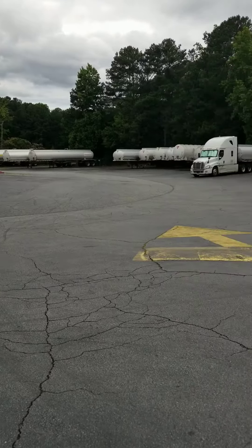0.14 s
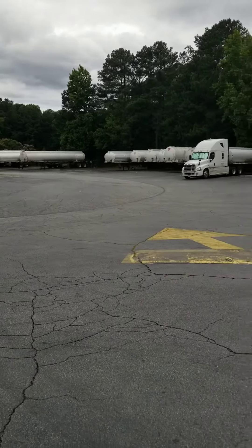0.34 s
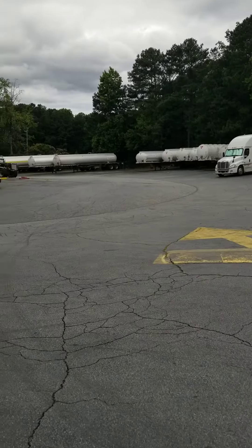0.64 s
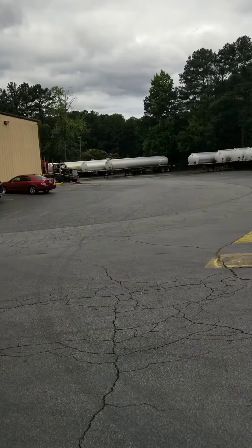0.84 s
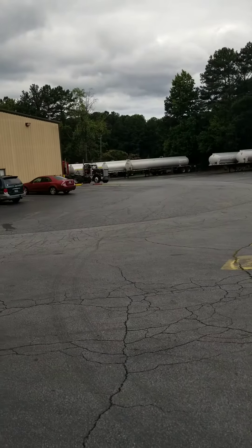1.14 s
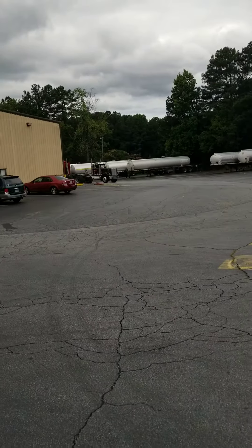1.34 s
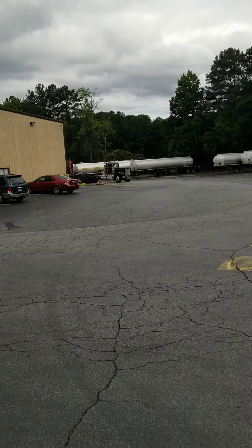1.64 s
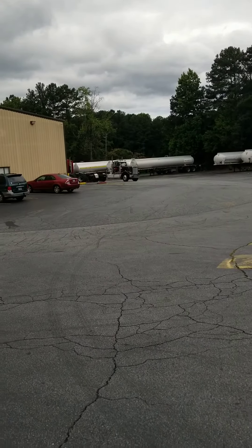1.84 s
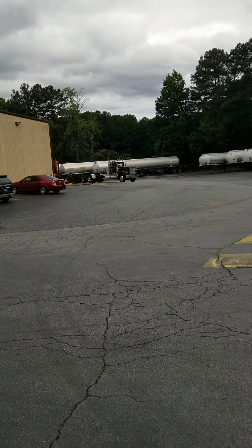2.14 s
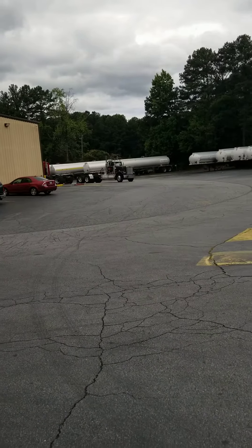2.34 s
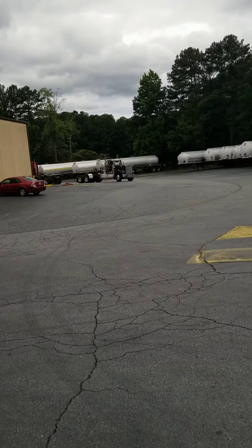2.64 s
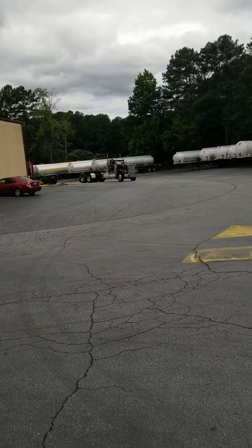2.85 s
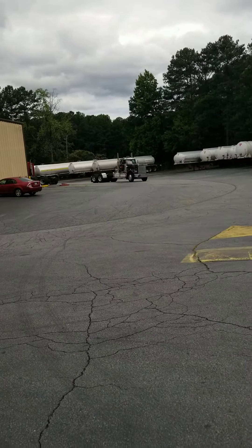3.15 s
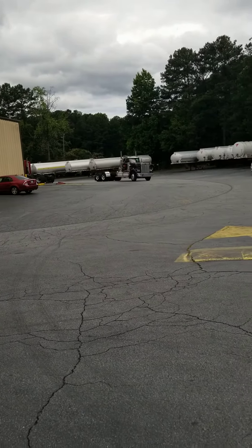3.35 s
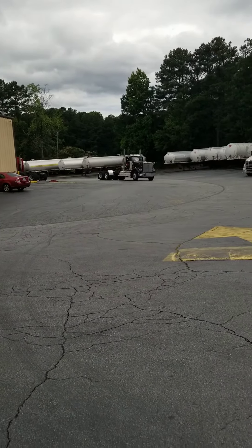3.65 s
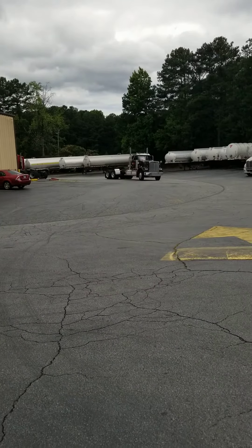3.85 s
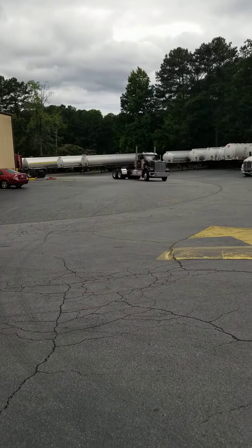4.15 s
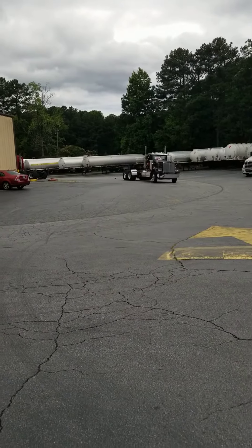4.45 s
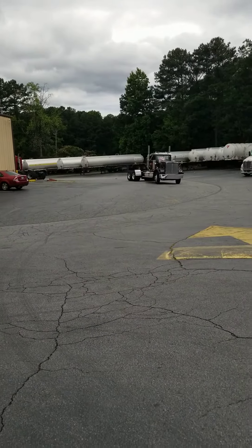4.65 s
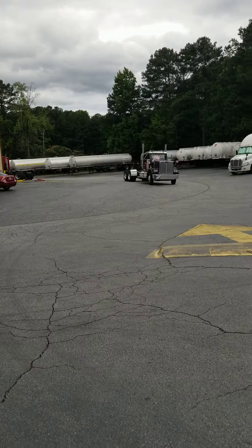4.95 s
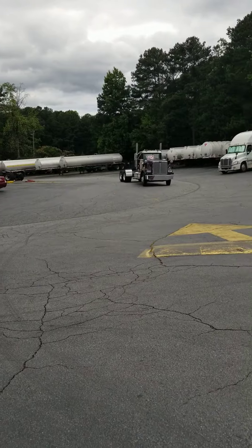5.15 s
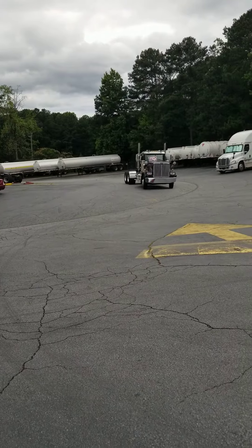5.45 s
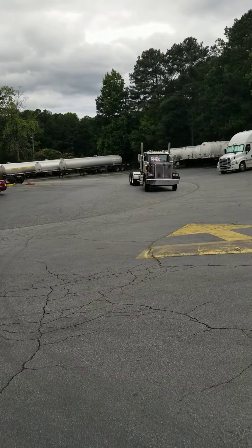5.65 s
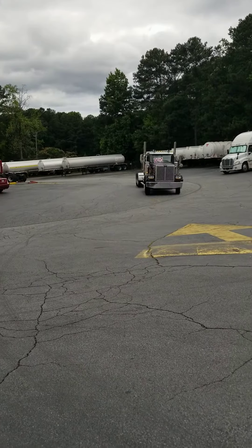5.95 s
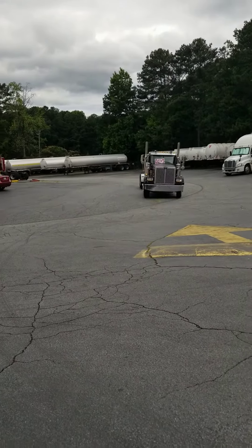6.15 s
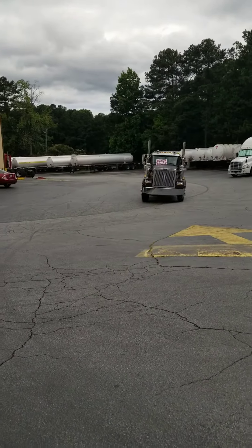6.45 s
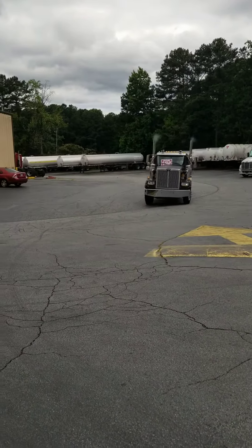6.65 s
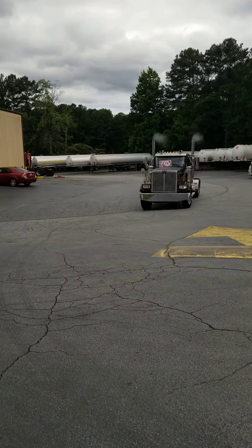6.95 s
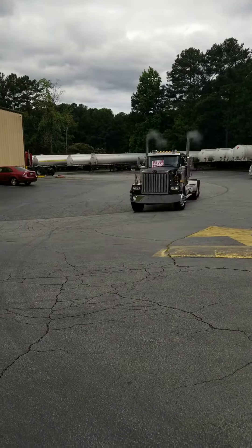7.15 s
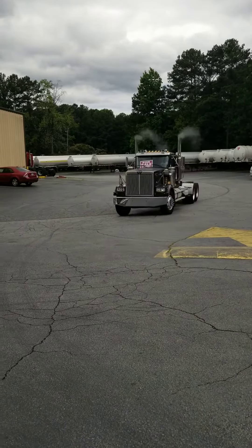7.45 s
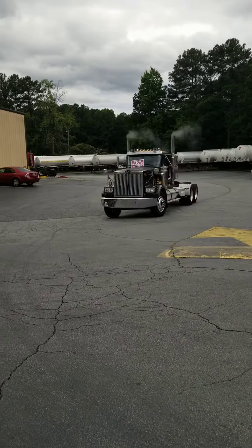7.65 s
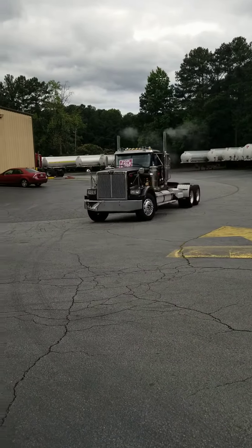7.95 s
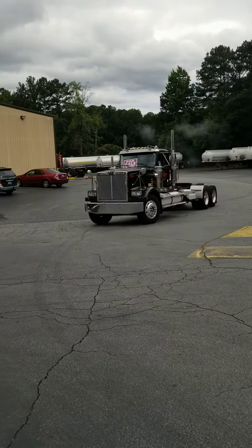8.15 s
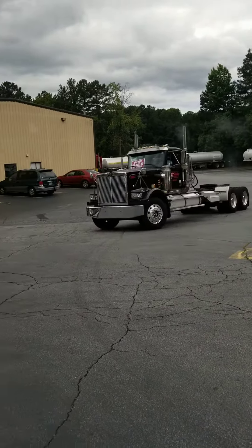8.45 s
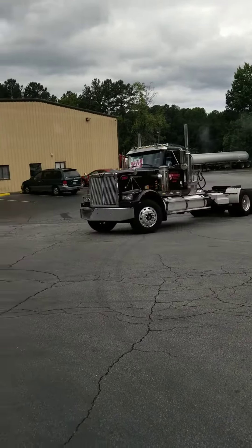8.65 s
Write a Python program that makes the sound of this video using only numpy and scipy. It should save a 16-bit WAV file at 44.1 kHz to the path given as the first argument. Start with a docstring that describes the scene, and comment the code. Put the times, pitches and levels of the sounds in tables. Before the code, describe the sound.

A six-cylinder diesel truck emerges from behind a shed in an open paved yard, its exhaust drone climbing and growing louder with clatter and intake whistle. Around six seconds a low wind bump hits the phone and the engine brake fires harsh, rapid cracks that slow as revs fall, echoing off buildings and trees. Then the engine runs lightly, the chassis squeaks twice, and it pulls again close by.

```python
"""A six-cylinder diesel tractor unit comes from behind a shed towards a phone in a paved yard, revs rising.
At about 6 s, some 34 m off, a gust meets the phone and the engine brake barks through the stacks.
After 7.3 s the engine runs on with little load, the chassis squeaks twice, and it picks up close by.
One crankshaft times exhaust orders, knocks, gear tones and brake cracks, made of sines, noise and pulses;
the ground reflects exhaust and brake cracks, and the yard echoes the brake, over a faint distant hum."""
import sys
import numpy as np
from scipy import signal
from scipy.fft import rfft, irfft
from scipy.io import wavfile

SR = 44100
rng = np.random.default_rng(int(sys.argv[2]) if len(sys.argv) > 2 else 0)


def wav_record(signal):
    """Record a signal, one row per channel, as 16-bit PCM in the file named by sys.argv[1]."""
    frames = np.transpose(np.atleast_2d(signal))
    bounded = np.clip(frames, -1, 1)
    # unit amplitude maps onto the largest positive 16-bit level
    quanta = np.round(bounded * 32767).astype(np.int16)
    wavfile.write(sys.argv[1], SR, quanta)


N = 388521
T = np.arange(N) / SR


def undb(db):
    """Decibels to gain."""
    return 10 ** (np.asarray(db) / 20)


def curve(rows, t=T):
    """The columns of a time table, interpolated at the times t."""
    s, *columns = np.transpose(rows)
    return [np.interp(t, s, column) for column in columns]


def unit(x):
    """Scale to rms 1."""
    return x / np.sqrt(np.mean(x ** 2))


def colour_at(points, hz):
    """Gain at hz of a spectrum given as (pitch_hz, level_db) points."""
    f, db = np.transpose(points)
    return undb(np.interp(np.log(np.maximum(hz, 1)), np.log(f), db))


def colour(x, points):
    """Causal minimum-phase filter with the given spectrum, built by folding its cepstrum."""
    size = 8192
    cepstrum = irfft(np.log(colour_at(points, np.fft.rfftfreq(size, 1 / SR))))
    cepstrum[1:size // 2] *= 2
    cepstrum[size // 2 + 1:] = 0
    response = irfft(np.exp(rfft(cepstrum)))
    return signal.oaconvolve(np.atleast_2d(x), response[None], axes=-1)[:, :N]


def walk(rate):
    """Smooth random wander with a spread near 1, through rate new values a second."""
    steps = rng.standard_normal(1024)
    place = np.minimum(T * rate, len(steps) - 2)
    k = place.astype(int)
    blend = (1 - np.cos(np.pi * (place - k))) / 2
    return steps[k] + (steps[k + 1] - steps[k]) * blend


def pair(apart):
    """Left and right noise, alike in the bass; in the treble apart 0 is alike, 1 unrelated."""
    mid, side = rng.standard_normal((2, N))
    side = signal.sosfilt(signal.butter(2, 850, "high", fs=SR, output="sos"), side)
    return mid + apart * np.array([side, -side])


def swish(hz, width_hz):
    """A narrow band of noise around a centre that may move; rms 1."""
    low_pass = signal.butter(2, width_hz / 2, fs=SR, output="sos")
    slow = signal.sosfilt(low_pass, rng.standard_normal((2, N)))
    angle = 2 * np.pi * np.cumsum(hz * np.ones(N)) / SR
    return unit(slow[0] * np.cos(angle) + slow[1] * np.sin(angle))


# the steady approach, and the distance at which the loudness laws hold
START_M, APPROACH_M_S, REFERENCE_M = 78, 7.3, 30


def distance():
    """Metres from the truck to the phone."""
    return START_M - APPROACH_M_S * T


STACK_HEIGHT_M, PHONE_HEIGHT_M, SOUND_M_S = 3.825, 1.51, 343


def bounce(x, share):
    """Stack sound comes direct and off the ground, later as the truck nears: a comb that slides down."""
    lag_s = 2 * STACK_HEIGHT_M * PHONE_HEIGHT_M / distance() / SOUND_M_S
    late = np.array([np.interp(T - lag_s, T, channel) for channel in x])
    return (x + share * late) / np.sqrt(1 + share ** 2)


# engine speed: start_s, firing_hz (firings a second, all cylinders)
SPEED = [(0, 75.1), (1.1, 74.7), (2.2, 81.5), (3.3, 87.7), (4.4, 91.6), (4.95, 94.6), (5.3, 93.8),
         (6.0, 88.47), (6.3, 82.79), (6.65, 76.14), (7.0, 67.8), (7.35, 60.06), (7.6, 66.4), (7.9, 62.1),
         (8.45, 62), (8.81, 68.5)]
# how hard the engine works, pulling or braking: start_s, load (0 none, 1 full throttle)
LOAD = [(0, 0.44), (1.8, 0.99), (3.0, 0.95), (4.1, 1), (5.3, 0.71), (5.6, 0.71), (5.93, 0.6), (6.1, 1.4),
        (7.3, 0.84), (7.5, 0.31), (7.8, 0), (8.35, 0.0074), (8.62, .62), (8.81, .66)]
CRUISE_HZ = 90  # firing rate at which the loudness laws hold
# the truck comes out from behind the shed between these times
EMERGES_S, IN_VIEW_S = 0.56, 1.02


def loudness(law):
    """Gain of one part of the engine from load, revs, distance and the shadow of the shed."""
    full_db, idle_db, revs_db, distance_db, shed_db = law
    (load,), (hz,) = curve(LOAD), curve(SPEED)
    hidden = np.clip((IN_VIEW_S - T) / (IN_VIEW_S - EMERGES_S), 0, 1)
    work_db = full_db - idle_db * (1 - load) + revs_db * np.log2(hz / CRUISE_HZ)
    path_db = distance_db * np.log2(distance() / REFERENCE_M) + shed_db * hidden
    return undb(work_db - path_db)


BRAKE_ON_S, BRAKE_OFF_S = 6.0003, 7.325
# gain of burble, turbo and accessory whine left while the brake cuts the fuel; time to cut it
COAST_SHARE, FUEL_CUT_S = 0.32, .03


def fuel():
    """1 while the engine fires, less while the brake is on."""
    braking = np.clip(np.minimum(T - BRAKE_ON_S, BRAKE_OFF_S - T) / FUEL_CUT_S, 0, 1)
    return 1 - braking * (1 - COAST_SHARE)


# spectrum of the distant hum: pitch_hz, level_db
DISTRICT = [(20, -19), (60, 3.5), (150, 6), (400, -8), (1000, -19.5), (3000, -28.5), (8000, -52),
            (16000, -65)]


def district():
    """The distant hum of the district: wide, dark noise that wavers slightly."""
    return undb(-38.5 + 1.0 * walk(3.3)) * unit(colour(pair(1.0), DISTRICT))


# spectrum of the air on the microphone ports: pitch_hz, level_db
BREEZE = [(10, -9), (30, -6), (60, -4), (150, -22), (600, -60)]
BREEZE_DB = -54
GUST_S, GUST_LENGTH_S, GUST_DB = 5.92, 0.24, 21  # centre, length, dB above the breeze


def breeze():
    """Air rumbles faintly on the microphone ports, partly alike in both, with one stronger gust."""
    gust_db = GUST_DB * np.exp(-((T - GUST_S) / GUST_LENGTH_S) ** 2)
    air = rng.standard_normal(N) + 0.6 * rng.standard_normal((2, N))
    return undb(BREEZE_DB + gust_db + 2 * walk(2.7)) * unit(colour(air, BREEZE))


def yard_echoes(x, t60_s=0.67, first_s=0.013):
    """Scattered echoes off the shed, trailers and trees: a decaying noise tail, duller than the source."""
    age = T[:SR]
    tail = rng.standard_normal((2, SR)) * undb(-60 * age / t60_s) * (age > first_s)
    tail /= np.sqrt(np.sum(tail ** 2) / 2)
    scattered = signal.oaconvolve(x[None], tail, axes=-1)[:, :N]
    return colour(scattered, [(150, 0), (400, 10), (750, 11.0), (1500, 6.5), (3000, -1.5), (9000, -25)])


# squeaks of the chassis in the turn: centre_s, pitch_hz, length_s, level_db
SQUEAKS = [(7.99, 2020, 0.033, -46), (8.074, 1920, .02, -38.5)]


def chassis():
    """Brief, rough squeaks as the frame twists: narrow noise bands under bell-shaped swells."""
    return sum(undb(db) * np.exp(-((T - s) / length) ** 2) * swish(hz, 260)
               for s, hz, length, db in SQUEAKS)


# centre of the intake swish: start_s, pitch_hz
TURBO_PITCH = [(0, 2134), (1.7, 2430), (2.3, 2836), (2.9, 2776), (3.4, 2404), (4.3, 2592), (5.3, 2066),
               (8.3, 2200), (8.7, 2780)]
# turbo loudness: full_load_db (at cruise revs), no_load_loss_db, per_rev_octave_db,
# loss_per_distance_doubling_db, loss_behind_shed_db
TURBO_LAW = (-36.5, 9.5, 19, 4, 7)


def turbo():
    """The intake swish, a noise band whose centre moves, grows louder with load and revs."""
    hz, = curve(TURBO_PITCH)
    return fuel() * loudness(TURBO_LAW) * undb(3.0 * walk(11)) * swish(hz, 480)


# whine loudness: full_load_db (at cruise revs, on resonance), no_load_loss_db, per_rev_octave_db,
# loss_per_distance_doubling_db, loss_behind_shed_db
WHINE_LAW = (-28, 34, 6, 4.5, 6)
WHINE_ORDER = 7.5  # multiple of the firing rate
HOUSING_HZ, HOUSING_WIDTH_HZ = 688.6, 42


def accessory(turns, hz):
    """An engine-driven whine swells as the revs carry it through the resonance of its housing."""
    detuning = 2 * (WHINE_ORDER * hz - HOUSING_HZ) / HOUSING_WIDTH_HZ
    resonance = 1 / (1 + detuning ** 2)
    whine = undb(2 * walk(12)) * np.sin(2 * np.pi * WHINE_ORDER * turns + 0.95 * walk(24))
    return fuel() * loudness(WHINE_LAW) * resonance * whine


# spectrum of the block clatter: pitch_hz, level_db
CLATTER = [(300, -4.5), (540, -7.5), (700, 5.5), (1000, 3.5), (1400, -7), (1900, -5), (2550, -2),
           (3100, -5.5), (3700, -8.5), (4100, -18), (5500, -18)]
# spectrum of the fan and intake hiss: pitch_hz, level_db
TREBLE = [(3000, -13), (4500, -9), (6000, -5.5), (6600, 9), (7400, -10.5), (8700, -9.5), (10200, 1.5),
          (12000, 2), (13800, -21), (15600, -18)]
# timing gears: multiple_of_firing_rate, level_db (sine peak over clatter rms)
GEARS = [(27.7, -14), (18.97, -19)]
# clatter and hiss loudness: full_load_db (at cruise revs), no_load_loss_db, per_rev_octave_db,
# loss_per_distance_doubling_db, loss_behind_shed_db
CLATTER_LAW = (-26.5, 10.5, 18, 7.5, 6.5)
HISS_LAW = (-46, 7.5, 19, 10.4, 13)


def block(turns):
    """Each combustion knocks the block; fan and intake hiss with it, and the timing gears sing."""
    knock_db = 3 * rng.standard_normal(1024)[(turns - turns[0]).astype(int)]
    knock = 1 + 0.5 * undb(knock_db) * np.exp(-(turns % 1) / 0.84)
    clatter = unit(colour(pair(0.59) * knock, CLATTER + [(9000, -36)]))
    hiss = unit(colour(pair(0.76) * knock ** 0.63, TREBLE))
    mesh = 0
    for order, db in GEARS:
        angle = 2 * np.pi * order * turns + 1.06 * walk(40)
        mesh = mesh + undb(db + 4.0 * walk(5.5)) * np.sin(angle)
    sound = loudness(CLATTER_LAW) * (clatter + mesh) + loudness(HISS_LAW) * hiss
    return undb(0.58 * walk(12)) * sound


# firing tone, swelling and fading on its way across the yard: start_s, level_db (rms)
FIRING_TONE = [(0, -54), (1.1, -40.5), (2.05, -29.5), (2.38, -46), (2.7, -27), (3.45, -31), (4.8, -23),
               (5.6, -19.5), (5.83, -40), (6.12, -26), (7.2, -39.5), (7.35, -40), (8.35, -32.5), (8.7, -24)]
# its octave: start_s, level_db (rms)
OCTAVE_TONE = [(0, -42), (.7, -37.5), (1.5, -31.5), (1.77, -23.5), (2.7, -20), (3.3, -28.5), (3.9, -20.5),
               (4.3, -11), (5.1, -17.5), (5.8, -36), (7.6, -41.5), (8.35, -38), (8.7, -24.5)]
# unequal cylinders, orders 0/6 to 5/6 above each firing harmonic: level_db
ORDER_DB = [5.5, -17, 0.5, 2.5, -2.5, -4.5]
# resonances of the stacks: pitch_hz, level_db
STACK = [(40, -38), (90, -66), (135, -2.5), (180, -7.5), (235, 3.5), (275, 0.5), (320, -9.5), (395, -2.5),
         (450, -18), (540, -21.5), (750, -54), (1000, -19)]
# spectrum of the rushing gas: pitch_hz, level_db
RUMBLE = [(25, -27), (60, -15), (130, -10.5), (230, 0), (310, -6.5), (390, -6), (470, -12.5), (750, -21.5),
          (1500, -57.5)]
# burble loudness: full_load_db (at cruise revs), no_load_loss_db, per_rev_octave_db,
# loss_per_distance_doubling_db, loss_behind_shed_db
BURBLE_LAW = (-17, 20, 9, 6, 9)
# high revs sharpen the exhaust pulses: gain of orders above the third firing harmonic, at cruise revs
RASP_DB, RASP_DB_PER_OCTAVE = -1.5, 3.5
GAS_DB = -7.5  # rush of gas relative to the burble
CYLINDER_COUNT = 6


def exhaust(turns, hz):
    """Firing tone, octave, and sixth-orders of unequal cylinders sweeping through the stack resonances."""
    (tone_db,), (octave_db,) = curve(FIRING_TONE), curve(OCTAVE_TONE)
    angle = 2 * np.pi * turns
    firing = undb(tone_db + 0.95 * walk(14)) * np.sin(angle)
    octave = undb(octave_db + 2.3 * walk(15)) * np.sin(2 * angle)
    tones = np.sqrt(2) * (firing + octave)
    rasp = undb(RASP_DB + RASP_DB_PER_OCTAVE * np.log2(hz / CRUISE_HZ))
    # hotter gas at high revs raises the stack resonances
    heat = (hz / hz.max()) ** 0.34
    burble, power = 0, 0
    for k in range(3, 56):
        if k in (6, 12):  # the firing tone and its octave, made above
            continue
        order = k / CYLINDER_COUNT
        gain = undb(ORDER_DB[k % len(ORDER_DB)]) * colour_at(STACK, order * hz / heat)
        if k > 3 * CYLINDER_COUNT:
            gain = gain * rasp
        # each order wanders slowly in level and phase, which roughens the burble
        shift = 2 * np.pi * rng.random() + .3 * walk(6)
        burble = burble + gain * undb(2.8 * walk(3.7)) * np.sin(order * angle + shift)
        power = power + gain ** 2 / 2
    gas = unit(colour(pair(1.0) * (1 + 0.6 * np.cos(angle)), RUMBLE))
    flow = burble / np.sqrt(power) + undb(GAS_DB) * gas
    return tones + fuel() * loudness(BURBLE_LAW) * bounce(flow, 0.45)


# the six cylinders in firing order: brake_valve_engages_s, crack_db (before the unevenness factor)
CYLINDERS = [(5.99, -1.7), (6.06, 1.5), (6.085, -9.5), (6.02, -5), (6.105, -7.5), (6.11, -5)]
# pulse strength of the engine brake: start_s, crack_db, boom_db
BRAKE = [(6, 2.5, -1.5), (6.15, -0.9, -8), (6.45, -0.9, -2.6), (6.7, -4, -1), (7, -3.6, 1.9),
         (7.32, -4, -2.5)]
# spectrum of the cracks: pitch_hz, level_db
CRACK = [(300, -10), (520, 2), (780, 9), (1000, 5.5), (1400, -1), (1900, 3), (2900, 4), (3900, -8),
         (5800, -20), (6700, -20.5), (8700, -26.5), (11000, -18.5), (13800, -32.5), (15500, -30)]
# low modes of the stacks: pitch_hz, width_hz, level_db
BOOM = [(160, 30, 0), (203, 55, 6.5), (255.7, 24.7, -0.5), (353, 110, -12), (420, 61, -11)]
# pulses weaker than this soften; treble lift of those that become shocks
SHOCK_FROM_DB, SHOCK_TREBLE_DB = 1, 8.5


def engine_brake(turns):
    """Each cylinder dumps its compressed air: a shock, a spit of gas, and the boom of the stacks."""
    count = np.arange(int(np.interp(BRAKE_OFF_S, T, turns)) + 1)
    times = np.interp(count, turns, T)
    engages, cylinder_db = np.array(CYLINDERS)[count % len(CYLINDERS)].T
    crack_db, boom_db = curve(BRAKE, times)
    # the cylinders soon grow more unequal as the revs sink
    uneven = np.minimum(1.1 * (times - BRAKE_ON_S), .95)
    chance = rng.standard_normal((len(count), 3)).T
    force_db = uneven * cylinder_db + .8 * np.sqrt(np.abs(uneven)) * chance[0]
    at = ((times + .0002 * chance[1]) * SR).astype(int)
    shocks, soft, blows = np.zeros((3, N))
    size = (times > engages) * undb(crack_db + force_db)
    # only the strongest pulses steepen into shocks on their way up the pipe
    steep = np.minimum(undb(3 * (force_db - SHOCK_FROM_DB - chance[2] ** 2)), 1)
    shocks[at] = size * steep
    soft[at] = size * (1 - steep)
    blows[at] = undb(boom_db + .6 * force_db + 2.5 * chance[2])
    sharp_cracks = colour(shocks, [(3000, 0), (8000, SHOCK_TREBLE_DB)])
    soft_cracks = colour(soft, [(2800, 0), (5000, -8), (9000, -28)])
    cracks = (sharp_cracks + soft_cracks)[0]
    age = T[:SR // 4]
    spit = signal.oaconvolve(cracks, np.exp(-age / .0016) * (age < .004))[:N]
    # the second stack is a little further away
    second = np.interp(T - .0021, T, cracks)
    bark = bounce(colour(cracks + 0.22 * second + .13 * spit * pair(0.94), CRACK), 0.48)
    ring = 0
    for k, (hz, width, db) in enumerate(BOOM):
        mode = np.exp(-np.pi * width * age) * np.sin(2 * np.pi * hz * age)
        ring = ring + (-1) ** k * undb(db) * mode
    # the ring of the stacks wavers irregularly in time, which roughens the boom
    boom = np.interp(T + .0008 * walk(28), T, signal.oaconvolve(blows, ring)[:N])
    return undb(11) * bark, undb(-9.5) * boom


def scene():
    """The hum of the district, a breeze, the truck and the echoes of its brake."""
    hz, = curve(SPEED)
    turns = np.cumsum(hz) / SR  # counts firings, zero when the brake comes on
    turns -= np.interp(BRAKE_ON_S, T, turns)
    bark, boom = engine_brake(turns)
    echoes = undb(-12) * yard_echoes(bark.mean(0) + .7 * boom)
    background = district() + breeze() + echoes
    engine = turbo() + accessory(turns, hz) + block(turns) + exhaust(turns, hz)
    return background + chassis() + engine + bark + boom


# the two microphone ports: pitch_hz, left_minus_right_db
PORTS = [(110, -.4), (200, -2), (380, -4.8), (700, -3), (1290, -8), (2380, -13.8), (4400, -8.5),
         (8120, -13.5), (15000, -27)]
# phase by which the left port leads: pitch_hz, lead_rad
PORT_PHASE = [(200, 0), (700, -.7), (1200, -.3), (2300, -.6), (4400, 3.5), (8100, 8), (11300, 14),
              (15000, 19)]
TOP_HZ = 15900


def record(dry):
    """The left port is shaded and out of step with the right; peaks are clipped, then the top is cut."""
    hz = np.fft.rfftfreq(N, 1 / SR)
    shade = colour_at(PORTS, hz)
    left = shade * np.exp(1j * np.interp(hz, *np.transpose(PORT_PHASE)))
    # the gains of the two ports always average 1
    ports = 2 * np.array([left, np.ones_like(left)]) / (1 + shade)
    heard = irfft(rfft(dry) * ports, N)
    top_cut = signal.ellip(8, .2, 70, TOP_HZ, fs=SR, output="sos")
    return signal.sosfilt(top_cut, np.clip(heard, -1, 1))


dry = scene()
out = record(dry)
wav_record(out)
```